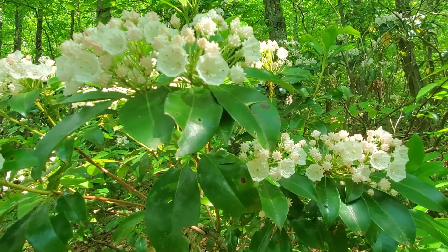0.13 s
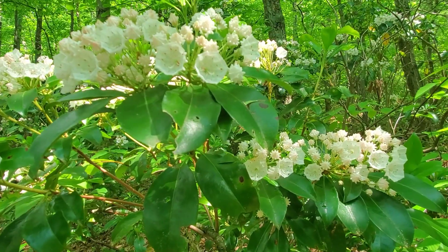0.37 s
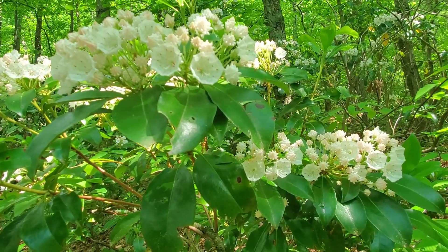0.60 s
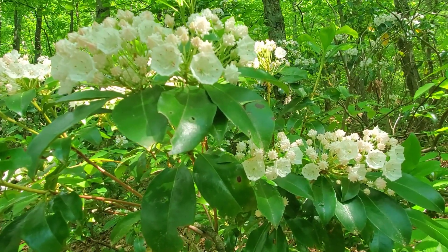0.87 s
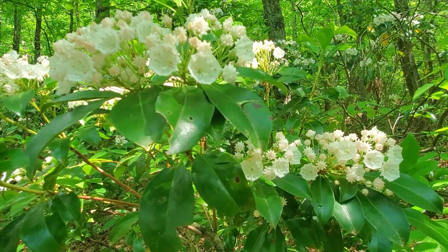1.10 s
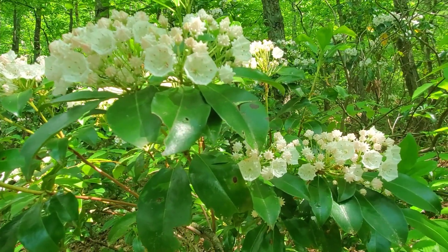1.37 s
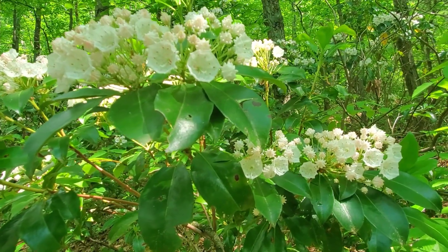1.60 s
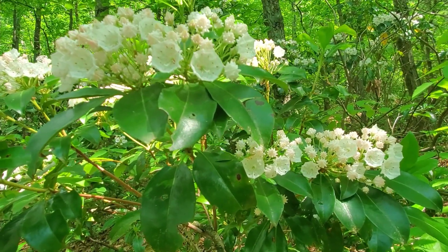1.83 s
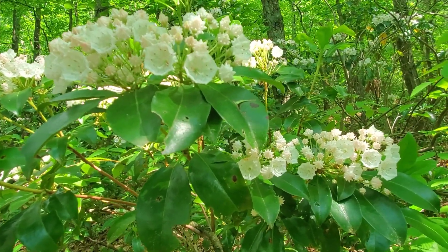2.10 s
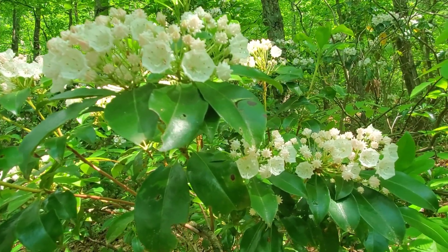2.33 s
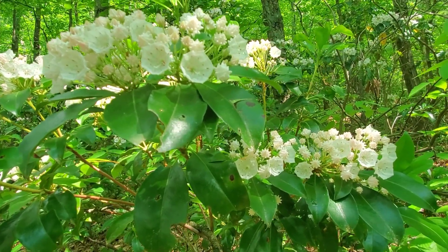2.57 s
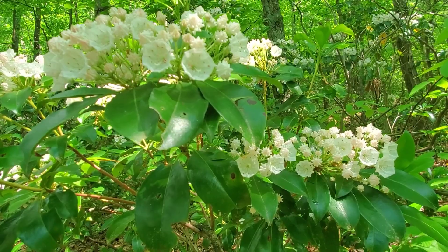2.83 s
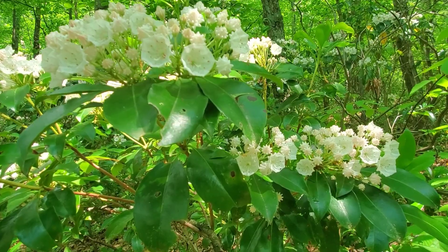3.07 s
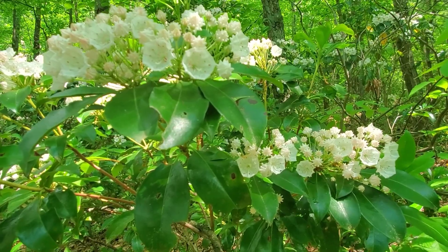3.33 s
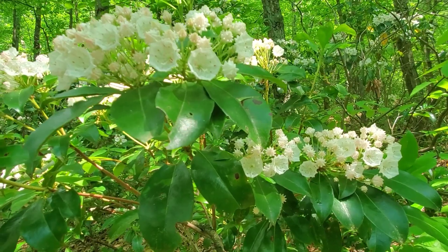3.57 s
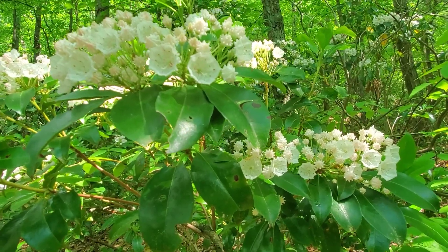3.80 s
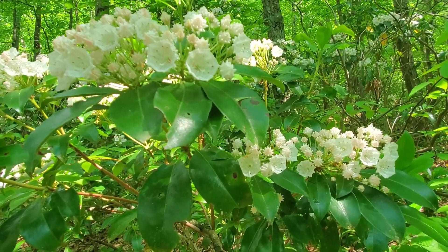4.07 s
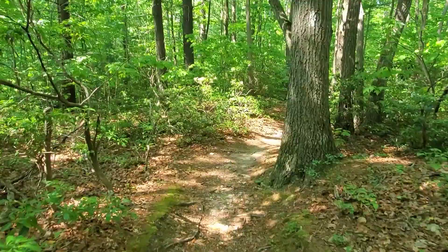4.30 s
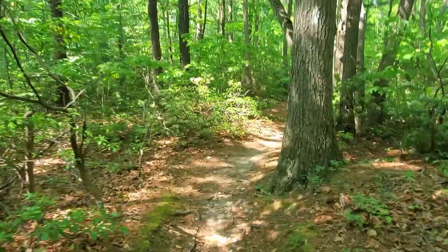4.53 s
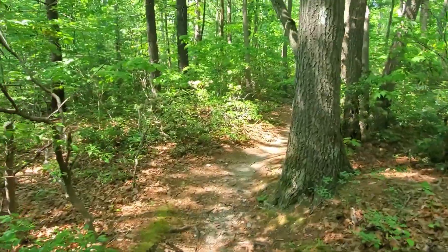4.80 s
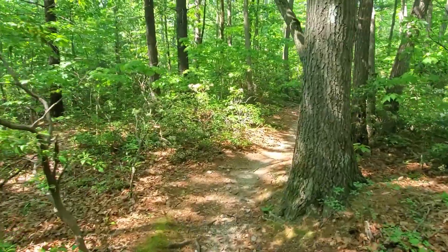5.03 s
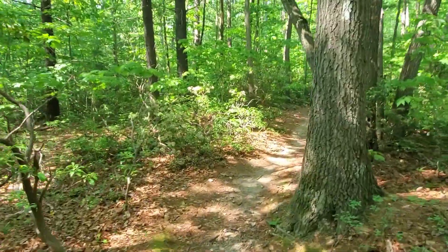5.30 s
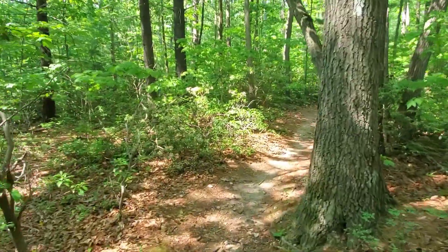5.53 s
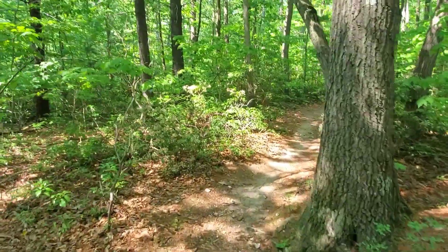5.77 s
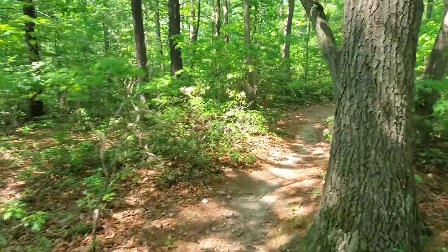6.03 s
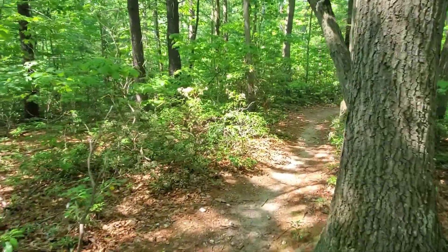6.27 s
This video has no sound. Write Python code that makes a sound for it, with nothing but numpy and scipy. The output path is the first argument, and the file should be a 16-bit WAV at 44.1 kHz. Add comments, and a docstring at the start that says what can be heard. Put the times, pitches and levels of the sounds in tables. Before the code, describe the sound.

Far birds whistle over a soft low hum, until abrupt close footsteps crackle through dry litter, thudding and scuffing along a dirt trail.

```python
"""A forest glade, then a dirt trail: the glade holds far traffic rumble with a low hum, hiss, a stir of leaves
and dull knocks, all shaped noise and sines. Distant birds are gliding sines that ring on as noise-like echoes.
On the trail boots crunch litter and grit (banded clicks and noise), twigs snap (struck resonances), soles drag,
heels thud, and low turbulence buffets the microphone ports, the right one far more than the left."""
import sys
import numpy as np
from scipy import signal
from scipy.fft import rfft, irfft, next_fast_len
from scipy.io import wavfile
from scipy.ndimage import uniform_filter1d

SR = 44100
rng = np.random.default_rng(int(sys.argv[2]) if len(sys.argv) > 2 else 0)


def file_out(sig):
    """Save sig as 16-bit WAV at sys.argv[1]."""
    # one column per channel
    cols = np.atleast_2d(sig).T
    # limit, then scale
    lim = np.clip(cols, -1, 1)
    pcm = np.round(lim * 32767).astype(np.int16)
    wavfile.write(sys.argv[1], SR, pcm)


def voltage_ratio(level):
    """Linear amplitude factor for a level in decibels (scalar or array-like)."""
    return 10 ** (np.asarray(level, float) / 20)


N = 281799
TIME = np.arange(N) / SR


def in_time(rows):
    """Columns of a curve table, one value per sample."""
    s, *columns = np.transpose(rows)
    return [np.interp(TIME, s, c) for c in columns]


def at_hz(points, hz, column=1):
    """A spectrum table read on a log-frequency axis."""
    points = np.array(points, float)
    return np.interp(np.log(np.maximum(hz, 1)), np.log(points[:, 0]), points[:, column])


def rms_one(x):
    """Scaled to unit power."""
    return x / np.sqrt(np.mean(x ** 2, axis=-1, keepdims=True) + 1e-20)


def left_right(left_db, right_db):
    """Fixed gains for the two ports."""
    return voltage_ratio(np.array([[left_db], [right_db]]))


def drift(rate):
    """Slow random wander: points of spread 1, this many a second, joined by lines."""
    return np.interp(TIME * rate, np.arange(4000), rng.standard_normal(4000))


def coloured(white, db):
    """Unit white noise given a density in dB per Hz on the FFT grid."""
    return irfft(rfft(white) * voltage_ratio(db) * np.sqrt(SR / 2), white.shape[-1])


def resonance(drive, hz, r):
    """A two-pole resonance whose ringing shrinks by r each sample."""
    return signal.lfilter([1, 0, -1], [1, -2 * r * np.cos(2 * np.pi * hz / SR), r * r], drive)


def grains(size, per_s, spread_db):
    """Random clicks of very uneven size."""
    born = rng.random(size) < per_s / SR
    sizes = voltage_ratio(spread_db * np.minimum(rng.exponential(1, size), 5))
    return rms_one(born * sizes * rng.choice([-1, 1], size))


def swells(starts, holds, peaks_db, rise_db_per_s, fall_db_per_s):
    """Level in dB of events that rise, hold and fall; overlapping ones add in power."""
    power = 1e-12
    for s, held, db in zip(starts, holds, peaks_db):
        rise_db = rise_db_per_s * np.maximum(s - TIME, 0)
        fall_db = fall_db_per_s * np.maximum(TIME - s - held, 0)
        power = power + voltage_ratio(2 * (db - rise_db - fall_db))
    return 10 * np.log10(power)


# boots in the litter, heel and roll of each tread, scuffs and a drag of the foot:
# (time [s], pressed [s], relative crunch [dB], relative grit [dB], relative leaf swish [dB])
BOOT_STEPS = [(4.485, 0.17, -55.5, -74.5, -76.5), (4.6, 0.16, -54.5, -65.5, -76),
              (5.102, 0.05, -58, -62, -70), (5.155, 0.028, -54, -64, -75), (5.21, 0.076, -55, -60.5, -88),
              (5.34, 0.1, -70, -64, -81), (5.5, 0.029, -68, -74, -83), (5.791, 0.11, -48.5, -59, -67.5),
              (6.03, 0.27, -60, -78, -72), (6.37, 0.042, -69, -75, -76)]
# how fast the layers die away as the litter springs back: crunch, grit, swish [dB per s]
LIFT_DB_PER_S = [115, 104, 70]
# colour of the tread: (frequency [Hz], relative left [dB per Hz], relative right [dB per Hz])
LITTER_COLOUR = [(186, -79, -77), (425, -76, -80), (960, -80.5, -82.5), (1520, -85, -88),
                 (2180, -86.5, -86), (3300, -88, -87), (4630, -89, -101), (5930, -99, -109),
                 (8100, -102, -107), (10600, -96, -99), (15000, -91, -113)]
LANDING_DB_PER_S, ROLL_DB = 1200, 2      # the weight lands fast and rolls unevenly
BRIGHTENS_DB_PER_OCTAVE_PER_DB = 0.4     # the more grit against crunch, the brighter the crunch
GRIT_FROM_HZ, SWISH_FROM_HZ = 2600, 7040


def tread():
    """Breaking leaves click together in the lower and middle bands, where crumbs ring in one band each;
    above about 3.8 kHz each port has its own noise: grit scuffs in the upper mids, leaves swish on top."""
    first = int(4.3 * SR)
    size = N - first
    s, pressed, *peaks_db = np.transpose(BOOT_STEPS)
    levels_db = []
    for db, fall in zip(peaks_db, LIFT_DB_PER_S):
        level_db = swells(s, pressed, db, LANDING_DB_PER_S, fall) + ROLL_DB * drift(25)
        levels_db.append(level_db[first:])
    tilt_db = np.clip(BRIGHTENS_DB_PER_OCTAVE_PER_DB * (levels_db[1] - levels_db[0] + 16.0), -6, 8)
    crack = grains(size, 700, 5.7)
    edges = 200 * 2 ** (np.arange(14) / 2)      # half-octave bands
    flutter = voltage_ratio(2.0 * drift(60)[first:])      # the rubbing of the sole is uneven
    layers = np.zeros((3, 2, size))             # crunch, grit, swish
    for low, high in zip(edges, edges[1:]):
        hz = np.sqrt(low * high)
        alike = np.clip(.74 - 0.81 * np.log2(max(hz / 2000, 1)), 0, 1)
        shared = 0.98 * crack + 1.4 * grains(size, .3 * hz, 3.77)
        own = rng.standard_normal((2, size)) * flutter
        drive = np.sqrt(alike) * shared + np.sqrt(1 - alike) * own
        band_filter = signal.butter(2, [low, min(high, 16000)], "band", fs=SR, output="sos")
        band = signal.sosfilt(band_filter, drive)
        band *= left_right(at_hz(LITTER_COLOUR, hz, column=1), at_hz(LITTER_COLOUR, hz, column=2))
        if hz < GRIT_FROM_HZ:
            layers[0] += band * voltage_ratio(tilt_db * np.log2(hz / 900))
        elif hz < SWISH_FROM_HZ:
            layers[1] += band
        else:
            layers[2] += band
    out = 0
    for layer, db, trim_db in zip(layers, levels_db, [1.5, 2.5, 11]):
        out = out + layer / np.sqrt(np.mean(layer ** 2)) * voltage_ratio(db + trim_db)
    return np.pad(out, ((0, 0), (first, 0)))


# twigs and pebbles: (time [s], relative ring level [dB], ring [Hz], relative crack level [dB])
TWIG_SNAPS = [(0.156, -41.5, 1410, -66), (4.479, -45, 500, -64), (4.513, -41, 505, -60),
              (4.52, -36.5, 605, -65), (4.53, -34.5, 554, -60), (4.576, -33.5, 480, -72),
              (4.589, -39, 480, -61), (4.611, -43, 860, -71), (4.642, -41.5, 496, -63),
              (4.691, -32, 1135, -37), (4.721, -39.5, 1120, -44), (4.743, -44, 1140, -56),
              (4.75, -52, 1300, -57), (4.776, -51, 800, -56), (4.797, -55, 1500, -59),
              (4.85, -52, 1100, -60), (4.871, -49, 950, -64), (4.891, -49.5, 1090, -59),
              (4.954, -54, 740, -66), (5.099, -50, 805, -46), (5.111, -48, 2307, -52),
              (5.14, -48, 1700, -57), (5.166, -39, 1970, -54), (5.186, -41, 700, -39),
              (5.217, -47, 495, -55), (5.249, -38.5, 877, -55), (5.275, -43, 550, -58),
              (5.283, -53, 750, -45), (5.298, -48, 2110, -40), (5.311, -49, 2000, -54),
              (5.336, -48, 545, -60), (5.518, -48, 1880, -58), (5.75, -47.5, 1010, -44),
              (5.769, -44, 2200, -60), (5.782, -38, 500, -49), (5.795, -35, 400, -52),
              (5.8, -43, 1900, -45), (5.812, -50, 420, -60), (5.832, -43, 1590, -35),
              (5.846, -38, 590, -55), (5.863, -37, 686, -48), (5.874, -43, 550, -60),
              (5.893, -41, 480, -60), (5.932, -35, 1080, -46), (5.969, -32, 900, -57),
              (5.974, -35.5, 413, -70), (6.016, -50, 1100, -64), (6.047, -50, 1080, -55),
              (6.099, -51, 1150, -62), (6.12, -47, 1300, -60), (6.14, -47, 1110, -58),
              (6.226, -57, 2000, -65), (6.243, -50, 2200, -64), (6.282, -53, 2200, -62),
              (6.371, -50, 1040, -55)]
SNAP_RISE_S, SNAP_CYCLES, SNAP_LEFT_DB = 0.00226, 7.8, 1   # a ring dies 60 dB in this many cycles


def snaps():
    """A short burst sets a damped resonance ringing, a little different at each port, with a bright crack on top."""
    size = 2000
    out, lag = np.zeros((2, N + size)), np.arange(size) / SR
    shared = rng.standard_normal((len(TWIG_SNAPS), 1, size))
    own = rng.standard_normal((len(TWIG_SNAPS), 2, size))
    bursts = (shared + 0.76 * own) * voltage_ratio(-60 * np.abs(lag - SNAP_RISE_S) / 0.0041)
    cracks = signal.sosfilt(signal.butter(4, [900, 3600], "band", fs=SR, output="sos"), bursts)
    pan = left_right(SNAP_LEFT_DB / 2, -SNAP_LEFT_DB / 2)
    for (s, db, hz, crack_db), burst, crack in zip(TWIG_SNAPS, bursts, cracks):
        ring = resonance(burst, hz, voltage_ratio(-60 * hz / (SNAP_CYCLES * SR)))
        # soft contact: little above the ring
        ring = signal.lfilter([1], [1, -np.exp(-2 * np.pi * 1.05 * hz / SR)], ring)
        ring = voltage_ratio(db + 3.5) * ring / np.abs(ring).max()
        crack = voltage_ratio(crack_db - 3.5) * crack / np.abs(crack).max()
        at = round(s * SR)
        out[:, at:at + size] += pan * (ring + crack)
    return out[:, :N]


# the sole drags over packed dirt: (time [s], relative level [dB])
DRAG_LEVEL = [(5.93, -78), (5.98, -69), (6.1, -62.5), (6.24, -59), (6.3, -63), (6.36, -88)]
# broad resonances of the drag: (frequency [Hz], width [Hz], relative level [dB])
DRAG_RESONANCES = [(1120, 180, -6), (2200, 230, -4), (4800, 520, -12.5)]


def drag():
    """Grit catches under the sole and excites its broad resonances."""
    drive = grains(N, 900, 4.4) + 0.79 * rng.standard_normal((2, N))
    out = 0
    for hz, width_hz, db in DRAG_RESONANCES:
        out = out + voltage_ratio(db) * rms_one(resonance(drive, hz, np.exp(-np.pi * width_hz / SR)))
    return out * voltage_ratio(in_time(DRAG_LEVEL)[0])


# dull thuds of heel and body reaching the ports:
# (time [s], right level before the decay [dB], frequency [Hz], left against right [dB])
BODY_THUDS = [(4.574, -31.5, 200, -14), (4.645, -33, 172, -9), (5.194, -47, 199, -5),
              (5.345, -29, 168, -25), (5.53, -25.5, 169, -27), (5.612, -31, 186, -13),
              (5.825, -32, 150, -7), (5.969, -25.5, 200, -8)]
THUD_CYCLES = 4.4   # a thud falls 30 dB in this many cycles


def thuds():
    """Each thud is a few cycles of low pressure that die away fast."""
    out = np.zeros((2, N))
    for s, db, hz, pan_db in BODY_THUDS:
        turns = np.maximum(TIME - s, 0) * hz
        fade = voltage_ratio(db - 60 * turns / (2 * THUD_CYCLES))
        onset = np.clip(2 * turns, 0, 1)
        out += left_right(pan_db, 0) * fade * onset * np.sin(2 * np.pi * turns)
    return out


# moving air at the right port: (time [s], relative level [dB])
AIR_LEVEL = [(4.36, -73), (4.38, -69), (4.44, -40.5), (4.61, -40.5), (4.62, -44.5), (4.67, -34.5),
             (4.73, -46), (4.74, -37.5), (4.82, -45.5), (4.83, -38.5), (5.04, -39), (5.09, -41),
             (5.2, -36.5), (5.26, -52), (5.3, -35), (5.38, -32), (5.4, -25.5), (5.47, -43.5), (5.51, -32),
             (5.63, -41.5), (5.77, -31.5), (5.89, -40.5), (5.94, -37), (5.96, -44.5), (6.0, -37.5),
             (6.08, -50.5), (6.16, -29), (6.22, -36.5), (6.24, -33.5), (6.33, -47), (6.37, -37),
             (6.39, -46)]
# colour of the turbulence: (frequency [Hz], relative density [dB per Hz])
AIR_COLOUR = [(12, -41), (20, -21.5), (46, 2.5), (64, 6.5), (90, 0), (179, -16), (340, -43), (400, -32.5),
              (520, -68), (880, -120)]
LEFT_PORT_DB, LEFT_PORT_FOLLOWS, LEFT_GUSTS_DB = -54, 0.27, 1.5   # sheltered: steadier, with gusts of its own
EVENNESS, EVEN_OVER_S = 0.5, 0.052   # share by which the noise's own loudness swings are evened out, over how long


def buffet():
    """Lumpy low turbulence, its own in each port; the sheltered left port hears it thinner."""
    db, = in_time(AIR_LEVEL)
    size = next_fast_len(N)
    hz = np.fft.rfftfreq(size, 1 / SR)
    thinner_db = np.array([[6.0], [0]]) * np.log2(np.maximum(hz / 50, 1))
    air = coloured(rng.standard_normal((2, size)), at_hz(AIR_COLOUR, hz) + thinner_db)[:, :N]
    power = uniform_filter1d(air ** 2, round(EVEN_OVER_S * SR)) + 1e-20
    air = air / power ** (EVENNESS / 2)
    lumps = voltage_ratio(1.46 * np.array([drift(30), drift(30)]))
    right_db = db + 6.5                           # the right port carries nearly all of it
    left_db = LEFT_PORT_DB + LEFT_PORT_FOLLOWS * (db + 24) + LEFT_GUSTS_DB * drift(9)
    return rms_one(air * lumps) * voltage_ratio(np.array([left_db, right_db]))


WARBLES_PER_S = 37


def whistle(notes, tremble_hz, warble_hz):
    """Gliding sines of trembling pitch and loudness; a warble swings the pitch quickly up and down."""
    song = np.zeros(N)
    swing = warble_hz * np.sin(2 * np.pi * WARBLES_PER_S * TIME + 1.45 * drift(8))
    for note in notes:
        hz, db = in_time(note)
        edge = np.clip(np.minimum(TIME - note[0][0], note[-1][0] - TIME) / 0.004, 0, 1)
        phase = 2 * np.pi * np.cumsum(hz + swing + tremble_hz * drift(190.0)) / SR
        song += np.sqrt(2) * edge * voltage_ratio(db) * np.sin(phase)
    return song * voltage_ratio(2.34 * drift(90))


def slide(s, length, from_hz, to_hz, db, loss_db=0):
    """A straight glide as rows of (s, Hz, dB); pitches above 4000 Hz may be fainter."""
    rows = []
    for share in (0, .5, 1):
        hz = from_hz + share * (to_hz - from_hz)
        rows.append((s + share * length, hz, db - loss_db * max(np.log2(hz / 4000), 0)))
    return rows


WOODS_T60_S, WOODS_DB = 1.0, -4.5
WOODS_DULL_HZ = 4530                       # leaves swallow the scatter above this
NEAR_TRUNKS_S, NEAR_TRUNKS_DB = 0.078, 3   # the nearest trunks send back a stronger early crowd of echoes
LEAF_STIR_PER_S = 45


def woods(song):
    """Trunks scatter a song into dense decaying echoes, three paths a side, mixed anew as leaves stir."""
    lag = np.arange(SR) / SR
    early_db = NEAR_TRUNKS_DB * np.clip((NEAR_TRUNKS_S - lag) / 0.023 + .5, 0, 1)
    fade = voltage_ratio(-60 * lag / WOODS_T60_S + early_db) * np.clip(lag / 0.0045, 0, 1)
    scatter = rng.standard_normal((6, SR)) * fade
    scatter = signal.sosfilt(signal.butter(2, WOODS_DULL_HZ, fs=SR, output="sos"), scatter)
    scatter = scatter / np.sqrt(np.sum(scatter ** 2, axis=1, keepdims=True))
    echoes = signal.fftconvolve(song[None], scatter, axes=1)[:, :N].reshape(2, 3, N)
    shares = np.array([drift(LEAF_STIR_PER_S) for _ in range(6)]).reshape(2, 3, N)
    return np.sum(echoes * shares, axis=1) / np.sqrt(np.sum(shares ** 2, axis=1))


# the hooked call of a far bird: (share of its length [0-1], share of its pitch range [0-1], added level [dB])
HOOK_SHAPE = [(0, 0.74, -11), (.2, 1, 3), (.33, 0.57, -2.5), (.48, 0.0091, -2), (.72, .23, -2),
              (1, 0.252, -2.5)]
# hooked calls: (time [s], length [s], lowest [Hz], highest [Hz], relative level [dB])
HOOKED_CALLS = [(2.237, .132, 3730, 5750, -58), (2.415, 0.14, 3760, 5800, -56)]
# slides of a far bird: (time [s], length [s], from [Hz], to [Hz], relative level [dB])
FAR_SLIDES = [(0.368, .027, 3100, 4250, -56), (0.395, .1, 4250, 4900, -63),
              (0.517, .055, 4150, 2800, -55.5), (1.058, .06, 3060, 3150, -71),
              (1.257, .028, 3440, 3400, -61), (1.296, 0.035, 3300, 4560, -55.5),
              (1.333, .02, 3350, 3450, -62), (1.459, .045, 2320, 3250, -59.5), (1.5, .03, 3250, 3700, -57),
              (2.345, 0.08, 3500, 2550, -59), (2.452, .014, 6000, 5000, -54), (2.52, 0.07, 2650, 3350, -61),
              (3.641, 0.022, 4200, 5700, -59), (3.657, .025, 4300, 4450, -67),
              (3.663, 0.057, 5700, 2850, -57), (3.74, 0.03, 3150, 4600, -55.5),
              (3.84, .05, 2550, 2750, -68), (3.886, .07, 2850, 2250, -65)]
# burry warbling sounds, mostly far birdsong, and a faint patch near 5 kHz during the drag:
# (time [s], length [s], centre from [Hz], to [Hz], relative level [dB])
BURRY_WARBLES = [(0.0, 0.038, 3520, 3400, -73), (0.729, 0.062, 3000, 3980, -67.5),
                 (1.919, 0.16, 2897, 3200, -67), (2.582, 0.1, 3227, 3300, -55),
                 (2.819, 0.1, 3340, 3190, -62.5), (2.894, 0.17, 3062, 3113, -58),
                 (3.109, 0.18, 3216, 3110, -70), (3.768, .04, 3800, 3300, -71),
                 (3.884, 0.051, 3300, 3000, -64), (4.121, 0.15, 2794, 3500, -68.5),
                 (6.042, 0.06, 4800, 5200, -68)]
# chips of a bird beside the trail: (time [s], length [s], from [Hz], to [Hz], relative level [dB])
NEAR_CHIPS = [(6.133, 0.014, 5000, 4700, -58), (6.292, 0.045, 5200, 4780, -69),
              (6.335, 0.027, 4750, 3400, -76)]
HIGH_NOTE_LOSS_DB_PER_OCTAVE, BIRDS_LEFT_DB, NEAR_SCATTER_DB = 14.5, 3, -8


def birds():
    """Far calls and warbles are heard mostly as their scatter off the trunks, the near bird almost dry."""
    notes = []
    for s, length, low, high, db in HOOKED_CALLS:
        notes.append([(s + t * length, low + p * (high - low), db + d) for t, p, d in HOOK_SHAPE])
    notes += [slide(*row, loss_db=HIGH_NOTE_LOSS_DB_PER_OCTAVE) for row in FAR_SLIDES]
    far = whistle(notes, tremble_hz=69.94, warble_hz=0)
    far = far + whistle([slide(*row) for row in BURRY_WARBLES], tremble_hz=200.8, warble_hz=239)
    near = whistle([slide(*row) for row in NEAR_CHIPS], tremble_hz=63.5, warble_hz=0)
    echoes = woods(far * voltage_ratio(3.7 * drift(300.0)) + voltage_ratio(NEAR_SCATTER_DB) * near)
    far_pan = left_right(BIRDS_LEFT_DB / 2, -BIRDS_LEFT_DB / 2)
    return far_pan * (voltage_ratio(-8.5) * far + voltage_ratio(WOODS_DB) * echoes) + near * left_right(3.0, -5.0)


# leaves stirring in the glade: (time [s], relative level [dB])
LEAF_STIR = [(2.3, -95), (2.55, -68), (2.62, -62), (2.75, -69), (3.0, -68), (3.4, -95)]


def rustle():
    """A faint stir of leaves high in the treble, as high-passed noise nearer the left port."""
    air = signal.sosfilt(signal.butter(4, 8000, "high", fs=SR, output="sos"), rng.standard_normal((2, N)))
    return rms_one(air) * voltage_ratio(in_time(LEAF_STIR)[0]) * left_right(0, -11.0)


# dull knocks in the glade: (time [s], level before the decay [dB], frequency [Hz], 60 dB decay [s])
KNOCKS = [(0.879, -46.5, 178, 0.21), (3.72, -57, 282, 0.24), (3.92, -56, 257, 0.49),
          (4.085, -44.5, 177.7, 0.22), (4.089, -54.5, 277, 0.22)]


def bumps():
    """Dull low knocks: sines that swell briefly and die."""
    out = np.zeros(N)
    for s, db, hz, t60 in KNOCKS:
        lag = np.maximum(TIME - s, 0)
        out += voltage_ratio(db - 60 * lag / t60) * np.clip(lag / 0.0076, 0, 1) * np.sin(2 * np.pi * hz * lag)
    return out


# swells of the far hum: (time [s], held [s], level [dB])
FAR_HUM = [(.17, 0.51, -58.5), (1.45, 0.067, -59), (1.97, 0.67, -56.5), (3.0, 0.066, -59)]
HUM_HZ, HUM_WAVER_HZ, HUM_RISE_DB_PER_S, HUM_FALL_DB_PER_S = 107.7, 1, 72, 81


def hum():
    """A far engine tone, a slightly wavering sine that swells and fades."""
    db = swells(*np.transpose(FAR_HUM), HUM_RISE_DB_PER_S, HUM_FALL_DB_PER_S)
    phase = 2 * np.pi * np.cumsum(HUM_HZ + HUM_WAVER_HZ * drift(3.92)) / SR
    return np.sqrt(2) * voltage_ratio(db) * np.sin(phase)


# left-right likeness of the background: (frequency [Hz], likeness [0-1])
PORT_LIKENESS = [(60, 0.99), (180, 0.93), (550, 0.92), (1650, 0.11), (4970, 0.1), (15000, 0)]


def background(table, rumble_db, right_late_s):
    """Far noise, alike in both ports in the bass and unrelated in the treble; the bass takes its own level."""
    size = next_fast_len(N)
    hz = np.fft.rfftfreq(size, 1 / SR)
    alike = np.clip(at_hz(PORT_LIKENESS, hz), 0, 1)
    mid, side = rfft(rng.standard_normal((2, size)))
    mid, side = np.sqrt((1 + alike) / 2) * mid, np.sqrt((1 - alike) / 2) * side
    late = np.exp(-2j * np.pi * hz * right_late_s)
    ports = [mid + side, (mid - side) * late]
    noise = np.array([coloured(irfft(ports[c], size), at_hz(table, hz, column=c + 1)) for c in (0, 1)])
    bass = irfft(rfft(noise) / (1 + (hz / 350) ** 4), size)
    return (noise - bass)[:, :N] + voltage_ratio(rumble_db) * bass[:, :N]


# glade background: (frequency [Hz], relative left [dB per Hz], relative right [dB per Hz])
GLADE_NOISE = [(25, -100, -87), (58, -74.5, -75), (106, -80, -80.5), (212, -85, -86.5), (457, -89, -91.5),
               (866, -96, -100), (1570, -95.5, -106), (2600, -95.5, -106), (3300, -97, -101),
               (4720, -103, -113), (6800, -105, -119), (8740, -107, -121), (11100, -108, -114),
               (15000, -105, -118)]
# trail background: (frequency [Hz], relative left [dB per Hz], relative right [dB per Hz])
TRAIL_NOISE = [(59.7, -77.5, -81), (196, -85.5, -100), (447, -92.5, -95.5), (700, -100.5, -101),
               (1570, -100.5, -102), (2000, -93.5, -98), (3300, -104, -103), (4700, -106, -110),
               (6300, -104, -118), (7800, -109, -117), (11200, -107, -108), (15000, -103, -114)]
# swell of the far traffic rumble: (time [s], gain [dB])
RUMBLE_SWELL = [(0, -0.5), (2.5, 0), (3, 1.5), (3.4, -1.5), (3.9, 1.5), (4.15, 1.5), (4.4, -0.5)]
LEFT_LEADS_S = 0.00025                   # the traffic lies to the left
WALK_STARTS_S, CROSSFADE_S = 4.432, 0.35


def scene():
    """The glade gives way to the trail in a short crossfade; birds and contact sounds lie over both."""
    walking = np.clip((TIME - WALK_STARTS_S) / CROSSFADE_S + .5, 0, 1)
    glade = background(GLADE_NOISE, *in_time(RUMBLE_SWELL), LEFT_LEADS_S) + hum() + rustle() + bumps()
    trail = background(TRAIL_NOISE, 0, 0) + buffet()
    place = (1 - walking) * glade + walking * trail
    return place + tread() + snaps() + drag() + thuds() + birds()


def band_limit(x):
    """A steep low-pass at the top of the band."""
    return signal.sosfilt(signal.butter(12, 15700, fs=SR, output="sos"), x)


TREBLE_STEP_HZ, TREBLE_STEP_DB = 7040, -8.5


def record(dry):
    """The microphone path drops by a step in the treble."""
    size = next_fast_len(N + SR // 10)
    hz = np.fft.rfftfreq(size, 1 / SR)
    step = voltage_ratio(TREBLE_STEP_DB * np.clip((hz - TREBLE_STEP_HZ) / 400 + .5, 0, 1))
    mix = irfft(rfft(dry, size) * step, size)[:, :N]
    return band_limit(mix)


dry = scene()
out = record(dry)
file_out(out)
```